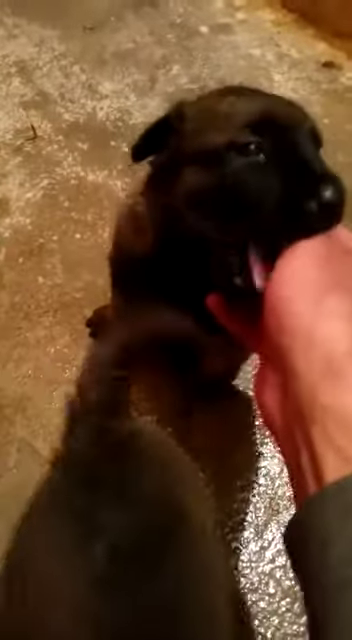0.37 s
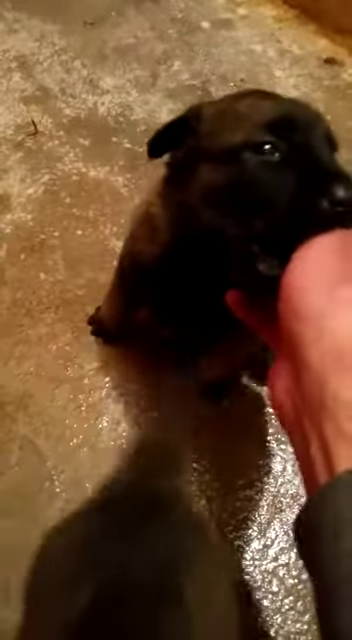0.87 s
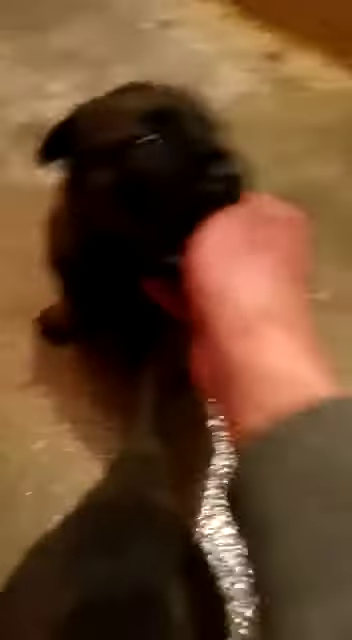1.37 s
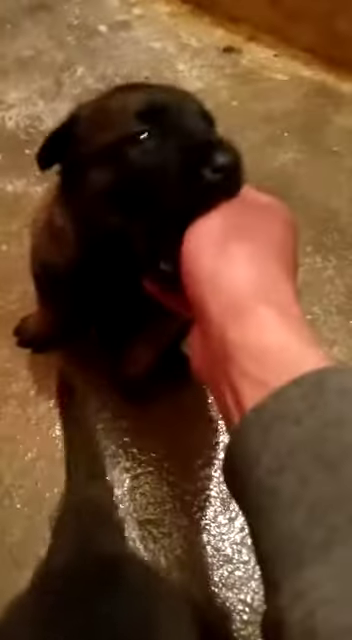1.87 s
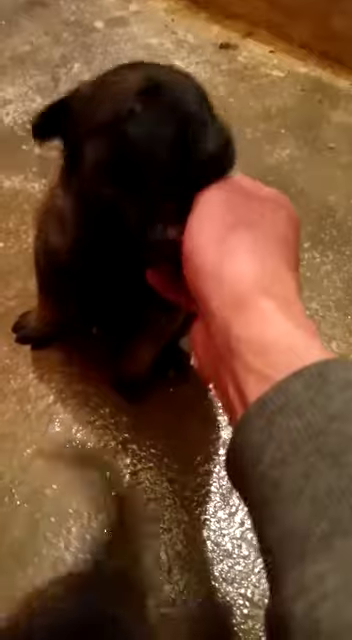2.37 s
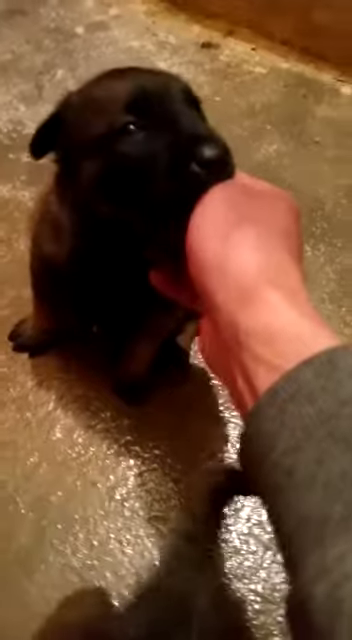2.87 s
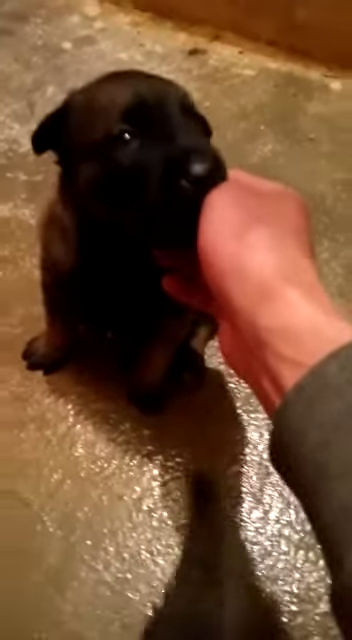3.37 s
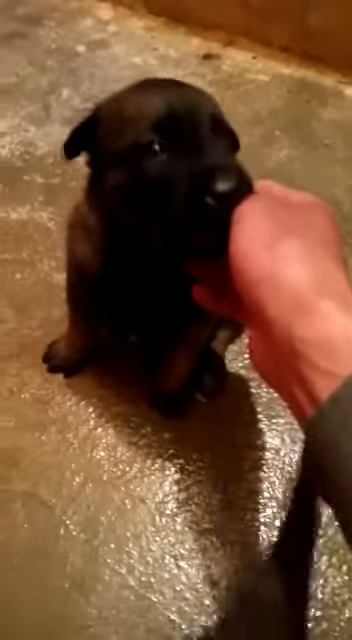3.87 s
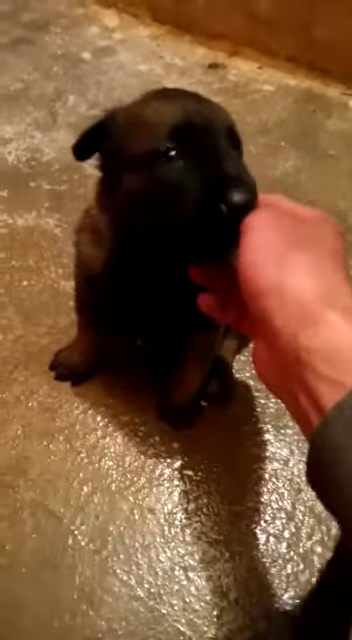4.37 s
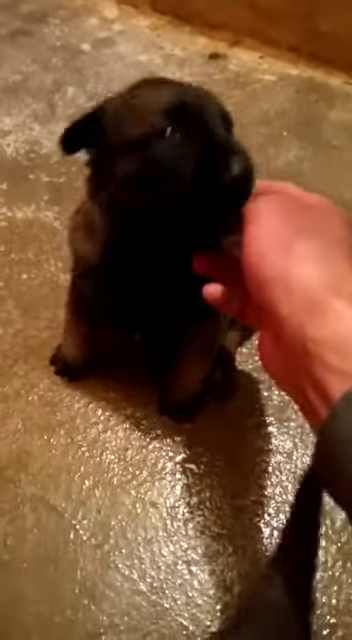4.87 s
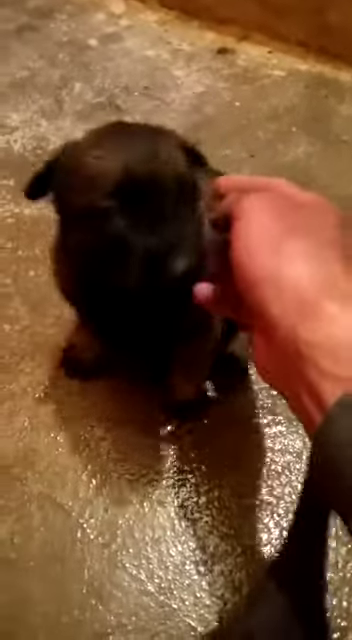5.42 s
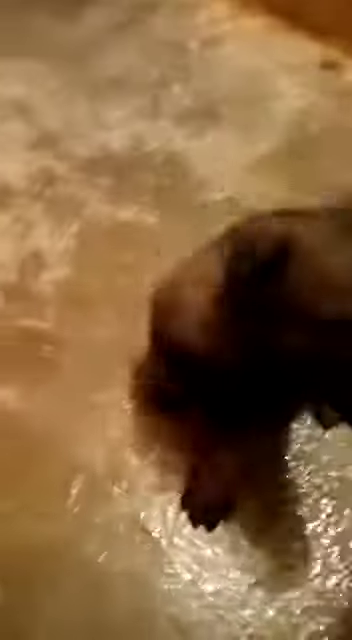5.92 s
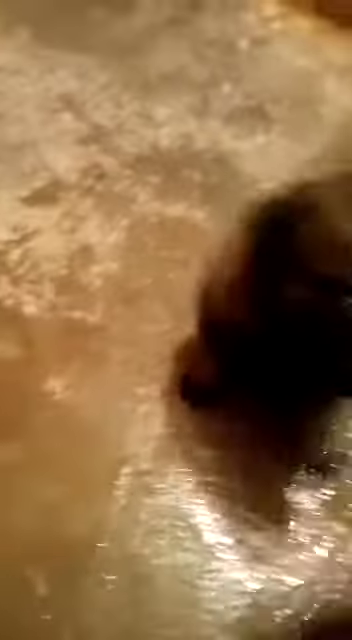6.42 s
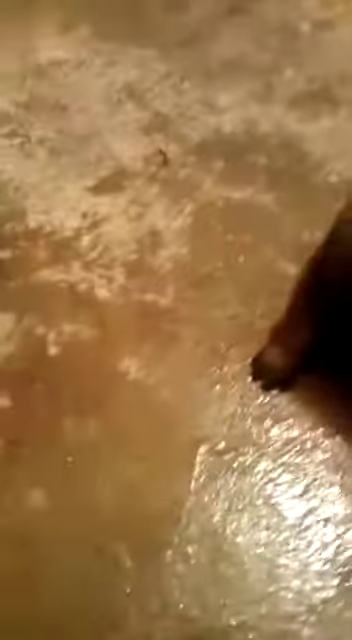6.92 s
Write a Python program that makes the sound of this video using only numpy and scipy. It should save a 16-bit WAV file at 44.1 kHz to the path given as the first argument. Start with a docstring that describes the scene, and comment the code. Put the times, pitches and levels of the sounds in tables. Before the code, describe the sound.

Short high puppy whimpers, some clean and some cracking or raspy, alternate with low grunts and little puffs of breath. Early cries sound slightly covered by the hand; later ones are sharper and airier, ending in tiny high whistles. Distant heavy blows rumble and rattle midway. Dull scuffs and dry claw clicks come last. Close handheld microphone, small reflective indoor space, centered sound, low background hush.

```python
"""Puppy crying in a hand

A puppy held by a hand cries in short yelps and low grunts in a bare, hard-floored room, panting between
them and whistling thinly through its nose as some cries stop. Its folds sing a clean stack of partials that
breaks into sidebands when strained. Lips and claws tick in short filtered noise; dull scuffs come and a low room
mode rings on. Heavy thuds elsewhere in the building boom and rattle over a steady hush. Both channels are the same."""
import sys
import numpy as np
from scipy import signal
from scipy.fft import rfft, irfft, next_fast_len
from scipy.io import wavfile
from scipy.ndimage import uniform_filter1d

SR = 44100
rng = np.random.default_rng(int(sys.argv[2]) if len(sys.argv) > 2 else 0)


def dump(signal):
    """Clip the signal to [-1, 1] and save it as 16-bit WAV at the path in sys.argv[1]."""
    limited = np.clip(np.atleast_2d(signal).T, -1, 1)
    pcm = np.round(limited * 32767).astype(np.int16)
    wavfile.write(sys.argv[1], SR, pcm)


def gain_from_db(level_db):
    """Turn a decibel level (scalar or array-like) into a linear amplitude factor."""
    decades = np.asarray(level_db, float) / 20
    return 10 ** decades


N = 310023
T = np.arange(N) / SR
MUZZLE_FREE_S = 5.2  # the hand colours and softens the cries until then

# resonances of the throat: centre_hz, gain_db
THROAT = [(300, -16), (520, -4.5), (720, 3.5), (950, -2.5), (1200, -10), (1600, -11), (1850, -10.5),
          (2600, -21.5), (3250, -40.5), (4600, -10.5), (5900, -14.5), (6400, -13.5), (7500, -29.5),
          (9500, -44.5)]
# bright colour of air through the nose: centre_hz, level_db (per Hz)
NOSE = [(1200, -22.5), (2000, -11.5), (3900, -14), (4700, -4), (6400, -7), (8000, -12), (12500, -33.5),
        (15300, -20.5)]


def shape(table, hz, column=1):
    """A table read on a log-frequency axis."""
    rows = np.array(table, float)
    return np.interp(np.log(np.maximum(hz, 1)), np.log(rows[:, 0]), rows[:, column])


def unit(x):
    """Scale to rms 1."""
    return x / np.sqrt(np.mean(x ** 2))


def noise(gain_at, size=N):
    """Noise of rms 1 whose amplitude spectrum is gain_at(Hz)."""
    fast = next_fast_len(size)
    hz = np.arange(fast // 2 + 1) * SR / fast
    spectrum = rfft(rng.standard_normal(fast)) * gain_at(hz)
    return unit(irfft(spectrum, fast)[:size])


def coloured(table):
    """Noise of rms 1 with a tabled spectrum."""
    return noise(lambda hz: gain_from_db(shape(table, hz)))


def bell(hz, centre_hz, width_hz):
    """The gain of a resonance applied twice."""
    return 1 / (1 + (2 * (hz - centre_hz) / width_hz) ** 2)


def bumps(rows, order=2):
    """Soft swells in time from rows (middle_s, half_length_s, height); a higher order gives a flat top."""
    return sum(height * np.exp(-((T - s) / half) ** order) for s, half, height in rows)


def decay(t, t60_s):
    """An exponential fade that loses 60 dB in t60_s."""
    return np.exp(-np.log(1000) * t / t60_s)


def add(out, s, x):
    """Mix x into out from time s."""
    start = int(s * SR)
    x = x[:N - start]
    out[start:start + len(x)] += x


def hush():
    """Steady background noise with a fixed colour."""
    # spectrum of the hush: centre_hz, level_db (per Hz)
    hush_colour = [(25, -25.5), (65, -12), (140, -3.5), (350, -12.5), (1000, -20), (2600, -20),
                   (6000, -19.5), (9000, -27), (13000, -28.5), (15500, -20.5)]
    return gain_from_db(-81) * coloured(hush_colour)


def thuds():
    """The low modes of the building shaken by blows, with a looser rattle above them that dies sooner."""
    # distant blows: peak_s, rise_s, boom_db, rattle_db
    blow_rows = [(1.102, 0.012, -75.5, -70.5), (2.704, 0.015, -52, -58.5), (3.287, 0.062, -49, -52)]
    # low modes of the building: centre_hz, width_hz, level_db
    modes = [(68.4, 13, -1.5), (90, 9.3, -6.5), (140.2, 17, 0.5), (178, 30, -8)]
    boom_t60_s, rattle_t60_s = 1.81, 0.75
    boom = noise(lambda hz: sum(gain_from_db(db) * bell(hz, f, w) for f, w, db in modes) * (hz > 45))
    rattle = noise(lambda hz: bell(hz, 210, 220) * (hz > modes[1][0]))
    out = np.zeros(N)
    for peak_s, rise_s, boom_db, rattle_db in blow_rows:
        since = np.maximum(T - peak_s, 0)
        rise = np.exp(np.minimum(T - peak_s, 0) / rise_s)
        out += gain_from_db(boom_db) * rise * decay(since, boom_t60_s) * boom
        out += gain_from_db(rattle_db) * rise * decay(since, rattle_t60_s) * rattle
    return out


def room(x):
    """Direct sound plus a diffuse echo, built in third-octave noise bands that each fade at their own rate."""
    # reverberation by band: centre_hz, t60_s, echo_db
    echo_rows = [(332, 0.54, 4.5), (900, 0.54, -10.5), (1750, 0.43, 3.5), (2010, 0.081, -7),
                 (3100, 0.22, -16), (5000, 0.25, -13.5), (10000, 0.034, -1)]
    t, echo = T[:SR], 0
    for hz in 200 * 2 ** np.arange(0, 6.3, 1 / 3):
        band = noise(lambda f: np.exp(-(np.log2(np.maximum(f, 1) / hz) / 0.26) ** 2), size=SR)
        onset = np.clip((t - .004) / 0.0011, 0, 1)  # the echo waits 4 ms
        tail = band * decay(t, shape(echo_rows, hz)) * onset
        even = np.sqrt(hz / SR / np.sum(tail ** 2))  # energy in step with bandwidth
        echo = echo + gain_from_db(shape(echo_rows, hz, column=2)) * tail * even
    return x + signal.fftconvolve(x, echo)[:N]


def scuffs():
    """Dull scuffs, and with some of them a low room mode near 272 Hz that rings on, as after a grunt."""
    # scuffs, levels before their envelopes: start_s, scuff_db, mode_db
    scuff_rows = [(6.038, -90, -73.5), (6.522, -41.5, -72), (6.575, -47, -101), (6.762, -47.5, -53.5),
                  (7.012, -76, -54)]
    out, t = np.zeros(N), T[:SR // 2]
    for s, scuff_db, mode_db in scuff_rows:
        scuff = noise(lambda hz: bell(hz, 760, 450) ** 2, size=len(t)) * np.exp(-t / 0.0049)
        mode = np.sin(2 * np.pi * 272 * t) * decay(t, 0.5)
        soft_start = 1 - np.exp(-t / 0.00066)  # no sharp edge
        add(out, s, (gain_from_db(scuff_db) * scuff + gain_from_db(mode_db) * mode) * soft_start)
    return out


def claws():
    """Dry clicks of claws on the hard floor: very short noise spread over the whole treble."""
    # clicks: start_s, peak_db
    click_rows = [(6.797, -57), (6.801, -50), (6.821, -57), (6.868, -53), (6.929, -50)]
    out, t = np.zeros(N), T[:600]
    for s, db in click_rows:
        click = noise(lambda hz: bell(hz, 7000, 9000) ** 2 * (hz > 1800), size=len(t)) * np.exp(-t / .0005)
        add(out, s, gain_from_db(db) * click / np.abs(click).max())
    return out


def ticks():
    """Short crackles of lips or claws, and one very high hiss burst beside a nose whistle."""
    # crackles, and last the hiss burst: start_s, peak_db, centre_hz
    tick_rows = [(0.461, -53, 4870), (0.532, -46, 4030), (1.265, -47.5, 4240), (1.659, -60.5, 4320),
                 (3.975, -55, 7750), (3.977, -54, 14700), (4.472, -61.5, 7160), (5.279, -56.5, 9100),
                 (6.42, -59, 8000), (5.398, -58, 15000)]
    out, t = np.zeros(N), T[:1500]
    for s, db, centre_hz in tick_rows:
        top = .1 * (centre_hz > 5500)  # the crisp ones reach the top
        crack = noise(lambda hz: bell(hz, centre_hz, 2800) ** 2 + top * bell(hz, NOSE[-1][0], 3000), size=len(t))
        crack = crack * np.exp(-t / .001)
        add(out, s, gain_from_db(db) * crack / np.abs(crack).max())
    return out


def sigh():
    """One slow, thin breath out: faint, wavering air in the resonances of the nose."""
    # the breath: middle_s, half_length_s, level_db
    slow_breath = (4.84, 0.11, -81.5)
    # its resonances: centre_hz, width_hz, level_db
    breath_bands = [(2100, 620, -3.5), (3540, 900, 0.5), (6300, 830, -4), (8350, 5000, -5)]
    s, half, db = slow_breath
    air = noise(lambda hz: sum(gain_from_db(band_db) * bell(hz, centre_hz, width_hz) ** 2
                               for centre_hz, width_hz, band_db in breath_bands))
    waver = gain_from_db(3 * noise(lambda hz: bell(hz, 0, 40)))
    return air * waver * bumps([(s, half, gain_from_db(db))])


def pants():
    """Air in soft puffs that flutter: duller early, brighter later."""
    # puffs: middle_s, half_length_s, level_db
    puff_rows = [(0.282, 0.011, -72), (0.536, 0.035, -68.5), (1.249, 0.013, -75.5), (1.443, 0.037, -78),
                 (2.295, 0.043, -82), (3.309, 0.045, -77), (4.059, 0.048, -71), (5.028, 0.091, -72.5),
                 (5.389, 0.0048, -69.5), (5.653, 0.044, -67.5), (5.831, 0.074, -67), (6.088, 0.058, -59.5),
                 (6.492, 0.24, -72.5), (6.586, 0.0053, -61.5), (6.765, 0.019, -60.5), (6.809, 0.052, -70),
                 (6.884, 0.028, -71.5), (7.028, 0.044, -60.5)]
    bright_from_s = 4.5
    flutter = gain_from_db(2.4 * noise(lambda hz: bell(hz, 0, 80)))
    dull = noise(lambda hz: bell(hz, 3700, 4600) ** 2 + 0.28 * bell(hz, 7600, 1500) ** 2
                 + 0.098 * bell(hz, NOSE[-1][0], 1800) ** 2)
    air = np.where(T < bright_from_s, dull, coloured(NOSE))
    return flutter * air * bumps([(s, half, gain_from_db(db)) for s, half, db in puff_rows])


def whistles():
    """Thin whistles in the nose as a cry stops: a narrow, wavering tone that starts fast and fades."""
    # whistles, levels before the envelope: peak_s (roughly), level_db, pitch_hz
    whistle_rows = [(5.0609, -72, 12540), (5.399, -62, 12040), (5.643, -71, 11850), (5.8292, -55, 11600),
                    (6.0447, -65, 11960)]
    out, t = np.zeros(N), T[:SR // 5]
    envelope = decay(t, 0.035) * (1 - np.exp(-t / 0.002))
    for s, db, whistle_hz in whistle_rows:
        tone = noise(lambda hz: bell(hz, whistle_hz, 320), size=len(t))
        add(out, s - .003, gain_from_db(db) * tone * envelope)
    return out


def ramp(s, span_s):
    """1 at time zero, falling in a line to 0 at span_s."""
    return np.clip(1 - s / span_s, 0, 1)


def cry(level_db, swell_db, open_db, ring_db, tilt_db, pitch, strain, wobble, shimmer):
    """Partials at the vocal folds; strain lets a beat of every third cycle and chance shake pitch and size."""
    # catches, where the voice flips and the treble drops out: middle_s, half_length_s, treble_db
    catch_rows = [(2.186, 0.0039, -28), (2.642, 0.0041, -37), (5.592, 0.019, -18)]
    ring_hz, mouth_hz = 1250, 3300  # lower edges of the second throat resonance and of the treble
    attack_cycles, release_s, release_db = 12.7, 0.0065, 0.5
    lips_open_s, lips_shut_s, lips_most_db = 0.025, .015, -13  # treble lost as the mouth opens and shuts
    grunt_hz, odd_db = 600, -16
    patchy_db, patchy_s = 3.5, .018

    start, end = pitch[0][0], pitch[-1][0]
    here = slice(int(start * SR), min(int(end * SR), N))
    t, strain, wobble, shimmer = T[here], strain[here], wobble[here], shimmer[here]

    # the folds take some cycles to swing up, harder with the muzzle free, and stop short
    attack_db = -9.5 if start < MUZZLE_FREE_S else -6
    level_db = level_db + swell_db * (t - start) / (end - start)
    level_db = level_db + attack_db * ramp(t - start, attack_cycles / pitch[0][1])
    level_db = level_db + release_db * ramp(end - t, release_s)
    lips_db = lips_most_db * (ramp(t - start, lips_open_s) + ramp(end - t, lips_shut_s))
    open_db = open_db + lips_db + bumps(catch_rows)[here]
    ring_db = ring_db + 0.16 * lips_db

    hz = uniform_filter1d(np.interp(t, *np.transpose(pitch)), size=50)
    phase = 2 * np.pi * np.cumsum(hz) / SR
    third = phase / 3 + .15 * wobble
    phase = phase + strain * (.9 * np.sin(third) + .25 * wobble) + .035 * shimmer

    order = np.arange(1, int(9500 / hz.max()) + 1)[:, None]
    partial_hz = order * hz
    overtone, high = order > 1, partial_hz > mouth_hz
    throat = gain_from_db(shape(THROAT, partial_hz))
    size = throat * np.where((partial_hz > ring_hz) & overtone, gain_from_db(ring_db), 1)
    size = size * np.where(high, gain_from_db(tilt_db * np.log2(partial_hz / mouth_hz)), 1)
    # in grunts strong and weak cycles alternate, which thins the low odd partials
    thinned = (order % 2) * overtone * (partial_hz < ring_hz) * (hz < grunt_hz)
    size = size * gain_from_db(odd_db * thinned)
    # the mouth shifts, so each high partial comes and goes on its own
    knots = np.arange(start, end + patchy_s, patchy_s)
    patchy = np.array([np.interp(t, knots, row) for row in rng.standard_normal((len(order), len(knots)))])
    size = size * gain_from_db(patchy_db * patchy * high)

    # balance treble against the rest, then undo the throat, which voice() applies
    low_rms, high_rms = (np.sqrt(np.sum(size ** 2 * part, axis=0) / 2) for part in (~high, high))
    size = size * np.where(high, gain_from_db(open_db) / high_rms, 1 / low_rms) / throat
    tone = np.sum(size * np.sin(order * phase + 0.87 * order ** 2), axis=0)
    edge = np.clip(np.minimum(t - t[0], t[-1] - t) / 0.0052, 0, 1)
    rasp = 1 + strain * (.45 * np.cos(third) + .4 * shimmer)
    return tone * rasp * gain_from_db(level_db) * edge


def voice():
    """Every yelp and grunt, sent through the throat so that rough moments keep its peaks and valleys."""
    # cries: level_db (after the attack), swell_db (by the end), open_db (treble over level),
    # ring_db (second throat resonance), tilt_db (treble, per octave),
    # pitch curve from first to last moment (time_s, pitch_hz)
    cry_rows = [ (-41.5, -0.5, -12.5, -7.5, 8, [(0.063, 982), (0.081, 911), (0.114, 950.7), (0.162, 871),
                (0.216, 915.2), (0.245, 900), (0.262, 710)]), (-40, -8, -31, -26, -7, [(0.465, 673),
                (0.475, 675)]), (-37.5, -4, -17.5, -4.5, 0, [(0.477, 794.4), (0.514, 740), (0.53, 680)]),
                (-42.5, 2, -31, -7.5, -18, [(0.833, 698.5), (0.864, 665.4)]),
                (-53.5, -1, -32, -25, 0, [(1.088, 337), (1.11, 333)]),
                (-49.5, 4.5, -14.5, -3, -4, [(1.111, 342), (1.12, 368), (1.158, 352.8)]),
                (-43, -2.5, -25.5, -18.5, 2, [(1.363, 348.5), (1.393, 364.8), (1.397, 320), (1.41, 307.1)]),
                (-56, 0, -12.5, 2, -16, [(1.702, 561), (1.724, 457.5), (1.754, 484), (1.768, 605)]),
                (-39, -2, -6, 9, -15, [(1.763, 823), (1.81, 900), (1.833, 1007)]),
                (-46.5, 1, -14, -7.5, -2, [(2.063, 938), (2.078, 835.5), (2.114, 915), (2.138, 931.5),
                (2.171, 946), (2.192, 1028), (2.21, 951.4), (2.228, 975.6), (2.25, 896)]),
                (-48, 2, -17.5, -9.5, 15.5, [(2.57, 705), (2.591, 842), (2.639, 946), (2.651, 1057),
                (2.672, 928), (2.705, 977), (2.723, 933), (2.732, 1003), (2.762, 940), (2.782, 784)]),
                (-40, -11.5, -30.5, -3.5, -33, [(3.345, 725), (3.369, 847), (3.385, 860)]),
                (-41.5, 2, -28, -10, -49, [(3.97, 815), (3.985, 699), (4.02, 777)]),
                (-42, 0, -20.5, -9.5, 0.5, [(4.635, 704), (4.665, 777), (4.7, 957)]),
                (-52, 3.5, -8, 0, 8, [(4.945, 1177), (4.964, 1200), (4.967, 1054), (4.985, 1046),
                (5.002, 1193), (5.0035, 1378), (5.02, 1346), (5.03, 1237), (5.043, 1266), (5.062, 1435)]),
                (-47, -1, -6.5, 3, -16, [(5.275, 1042), (5.305, 987), (5.32, 1040), (5.375, 1011),
                (5.398, 1157)]), (-45, 2.5, -4, -5, -2, [(5.578, 900), (5.589, 715), (5.601, 680),
                (5.61, 752), (5.619, 914), (5.645, 967)]), (-47.5, 9.5, -7.5, -13, 17, [(5.775, 880),
                (5.796, 864), (5.814, 952.6), (5.825, 927)]), (-48.5, 9, -5.5, -11, 2, [(5.994, 913),
                (6.018, 930), (6.035, 985)]), (-44, -2, -6.5, -6.5, 8, [(6.335, 756), (6.359, 798),
                (6.365, 837), (6.38, 908), (6.407, 1020), (6.447, 954)]),
                (-49, 5.5, -5, -6, 15, [(6.633, 1255), (6.641, 1063), (6.69, 985), (6.713, 1058),
                (6.74, 988), (6.748, 910)]), (-45.5, -4.5, -47, -8, -12, [(6.722, 301.3), (6.748, 371),
                (6.765, 320.5), (6.775, 275)]), (-48, 1, -7.5, -2.5, 6, [(6.939, 881), (6.955, 851),
                (6.98, 1014)]), (-44, -13, -11, -3.5, 1, [(7.008, 900), (7.03, 980)]), ]
    # moments when the voice breaks up: middle_s, half_length_s, strain (0-1)
    strain_rows = [(.505, 0.063, 0.38), (1.155, 0.0076, 0.27), (1.403, 0.0044, 0.22), (1.772, 0.009, 0.4),
                   (2.094, 0.027, 0.45), (2.616, 0.015, 0.58), (2.772, 0.027, 0.15), (6.357, 0.018, 0.43),
                   (6.76, 0.023, 0.12), (7.025, 0.018, 0.54), (1.1, .012, .6), (1.712, .012, .5),
                   (5.012, .012, .06), (5.612, .012, .25)]
    # colour of the muzzle held in a hand: centre_hz, gain_db
    hand_colour = [(2200, 0.5), (2900, -7), (4000, 8.5), (5000, 1), (5900, -14.5), (6500, -4), (7400, -16),
                   (8500, -10), (10000, -11)]
    # air that hisses along with a cry: centre_hz, width_hz, level_db (relative to the voice)
    hiss_rows = [(7310, 1500, -37), (15400, 2300, -38.5)]
    out, strain = np.zeros(N), bumps(strain_rows, order=4)
    wobble, shimmer = (noise(lambda hz: bell(hz, 0, width_hz)) for width_hz in (300, 700))
    for row in cry_rows:
        add(out, row[-1][0][0], cry(*row, strain, wobble, shimmer))

    fast = next_fast_len(N)
    hz = np.arange(fast // 2 + 1) * SR / fast
    free = rfft(out, fast) * gain_from_db(shape(THROAT, hz))
    held = free * gain_from_db(shape(hand_colour, hz))
    sung = np.where(T < MUZZLE_FREE_S, irfft(held, fast)[:N], irfft(free, fast)[:N])

    hiss = np.zeros(N)
    for centre_hz, width_hz, db in hiss_rows:
        joins = (centre_hz < 10000) | (T > 3.9)  # the thinnest hiss joins only the later cries
        hiss += gain_from_db(db) * noise(lambda f: bell(f, centre_hz, width_hz) ** 2) * joins
    loudness = uniform_filter1d(np.abs(sung), size=300)
    return sung + loudness * hiss


def scene():
    """The puppy in the room over the thuds and the steady hush."""
    puppy = voice() + pants() + sigh() + ticks() + claws() + whistles() + scuffs()
    mono = room(puppy) + thuds() + hush()
    return np.array([mono, mono])


def roll_off(x):
    """The treble ends steeply here."""
    return signal.sosfilt(signal.butter(12, 15850, fs=SR, output="sos"), x)


def record(dry):
    """The finished mix as it is heard."""
    return roll_off(dry)


dry = scene()
out = record(dry)
dump(out)
```